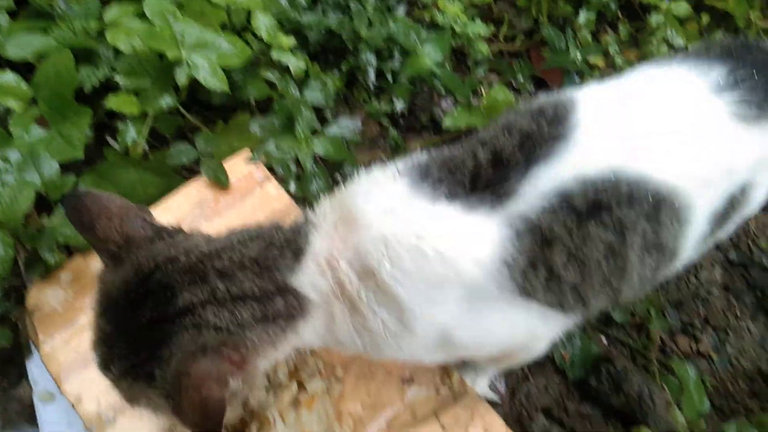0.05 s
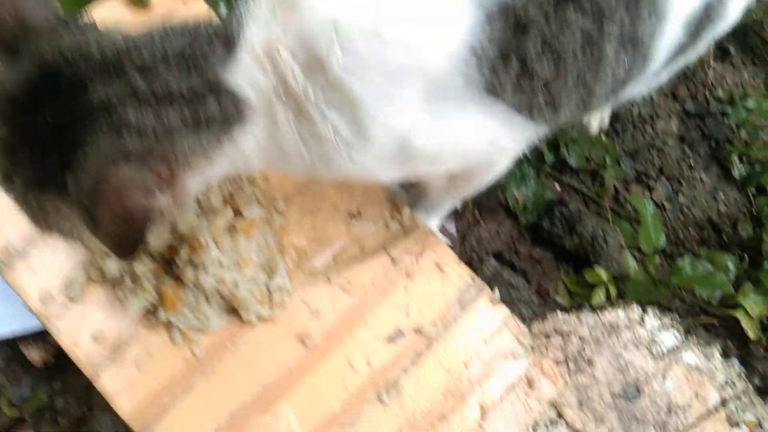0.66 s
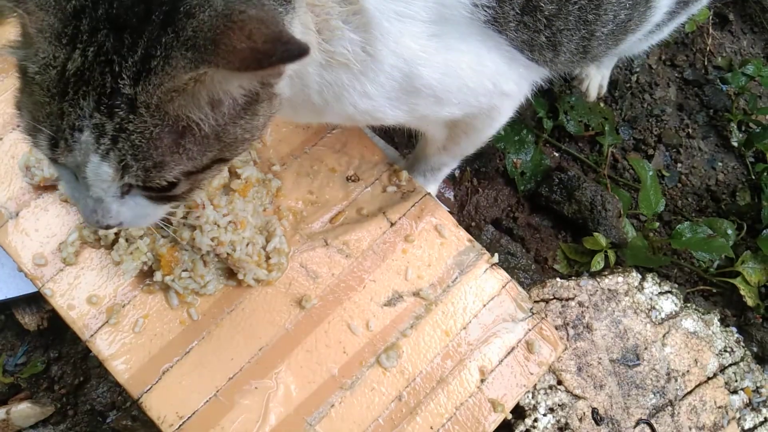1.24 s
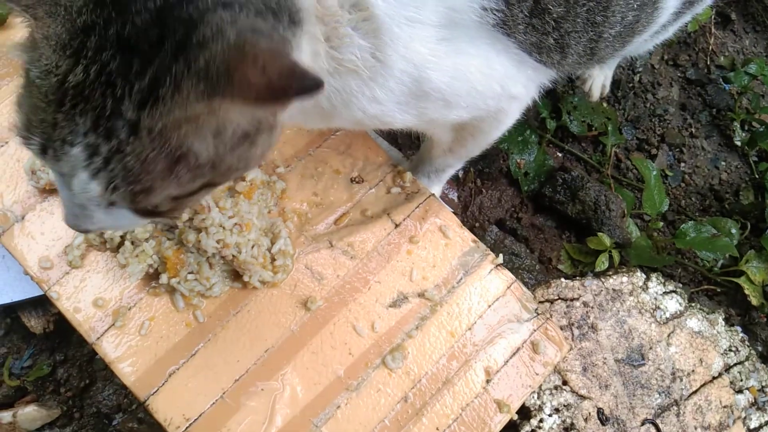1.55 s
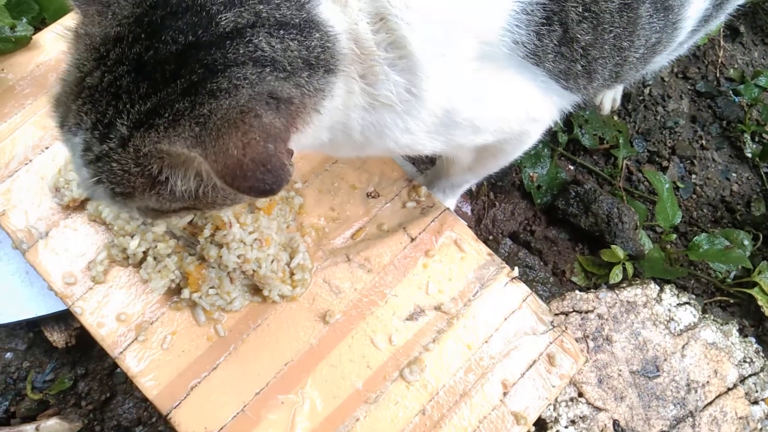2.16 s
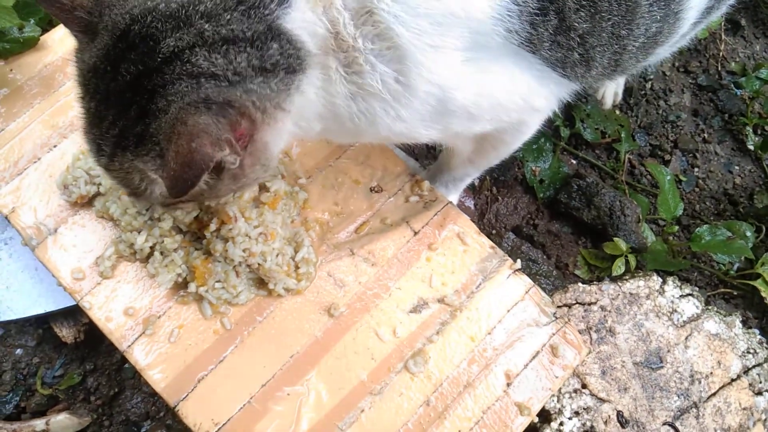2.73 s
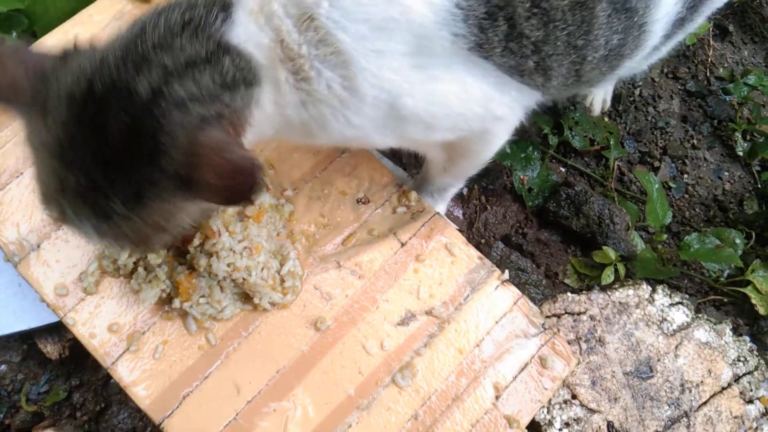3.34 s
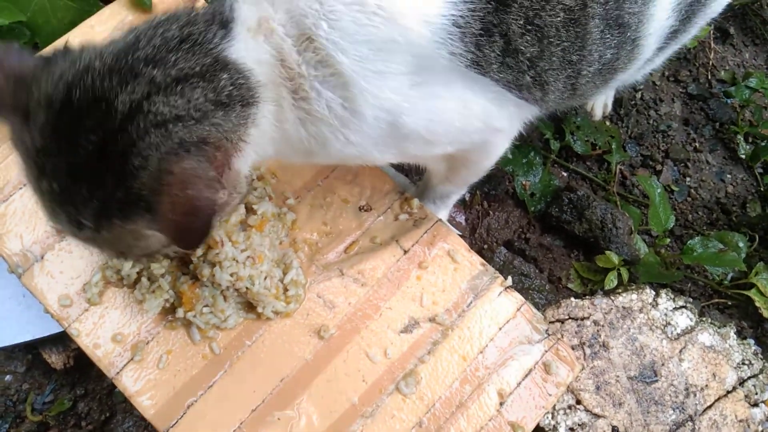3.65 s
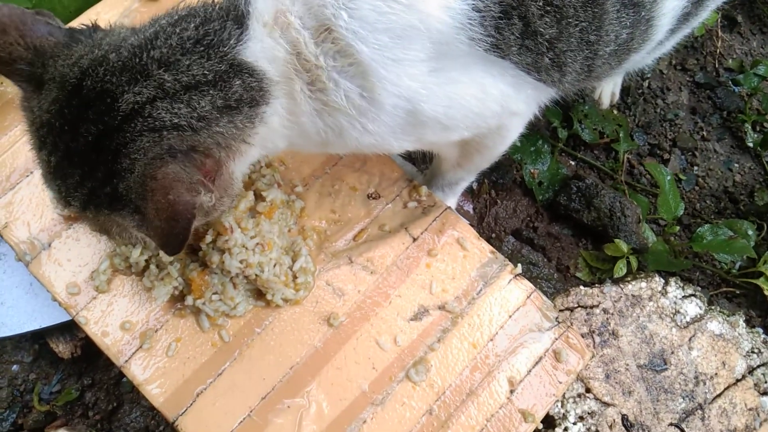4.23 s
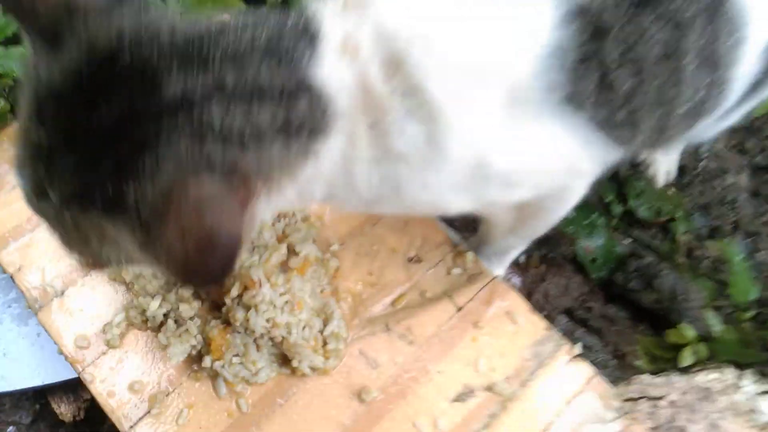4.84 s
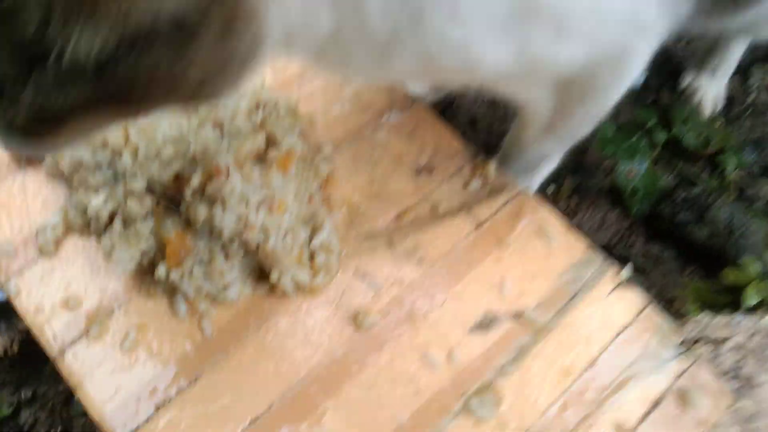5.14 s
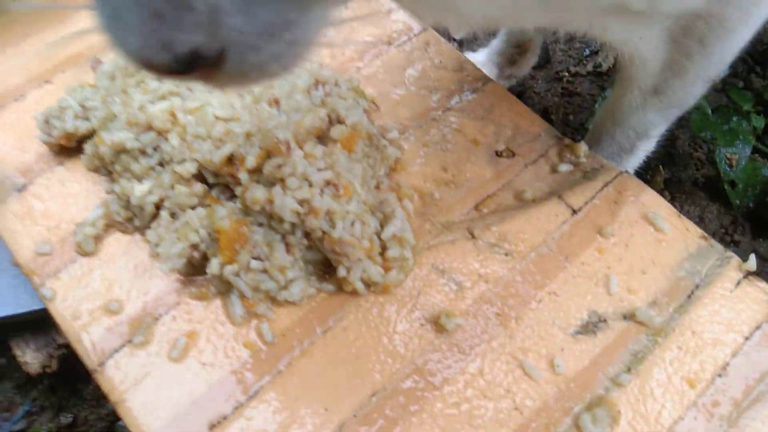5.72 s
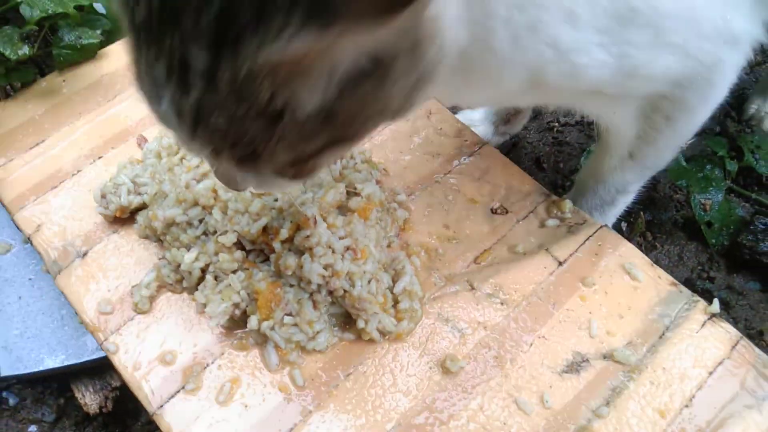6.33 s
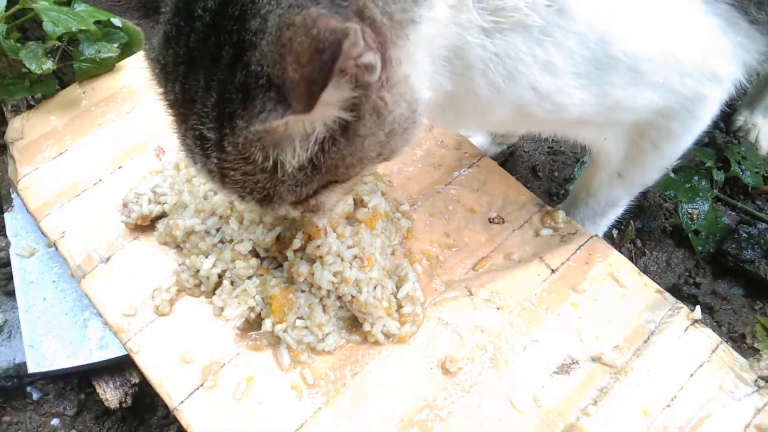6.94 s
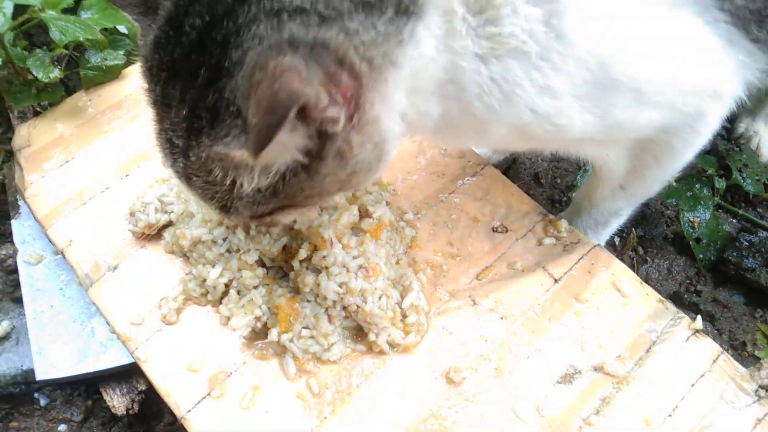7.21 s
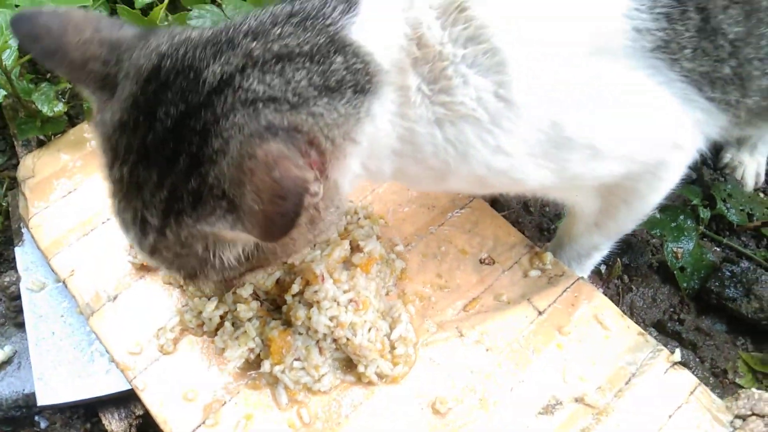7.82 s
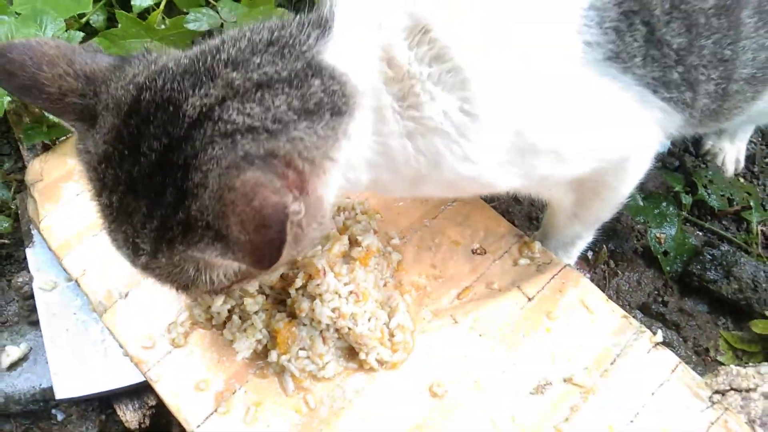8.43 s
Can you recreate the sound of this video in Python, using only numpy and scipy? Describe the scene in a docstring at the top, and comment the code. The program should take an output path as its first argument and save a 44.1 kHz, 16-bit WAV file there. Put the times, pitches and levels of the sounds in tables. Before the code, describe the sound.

A cat eats wet rice right by the microphone in a damp yard. Quick, sticky smacks and clicks of its mouth run on unevenly throughout, with soft squelching between them and an occasional small gulp. Small birds chirp a little way off in two spells, one early and one in the second half. Light rain hisses faintly underneath, and the yard adds a slight echo.

```python
"""A cat chewing wet rice

A cat eats from a wooden board in a damp yard, close to the microphone. Films of saliva tear in sticky
smacks that ring the mouth; the mash squelches and fizzes between them. Small birds chirp a little way
off, nearby walls answer, and light rain hisses; a noise suppressor thins the quiet parts."""
import sys
import numpy as np
from scipy import signal
from scipy.fft import rfft, irfft
from scipy.io import wavfile
from scipy.ndimage import uniform_filter1d

SR = 44100
rng = np.random.default_rng(int(sys.argv[2]) if len(sys.argv) > 2 else 0)


def unload_audio(sound):
    """Save the sound as a 16-bit wav file, at the path given as the first command line argument."""
    columns = np.transpose(np.atleast_2d(sound))
    # keep every value between -1 and 1, then stretch to whole-number steps
    steps = np.round(np.clip(columns, -1, 1) * 32767)
    wavfile.write(sys.argv[1], SR, steps.astype(np.int16))


N = 373562

# Clear smacks: (time [s], pop level [dB], mouth resonance [Hz], jaw thud [dB re pop],
# tooth snap [dB re pop], saliva fizz [dB re pop], squish [0 crisp to 1 smeared])
SMACKS = [(0.01, -44, 1650, -13, -8.5, -9.5, 0.98), (0.082, -47, 1670, -24, -28, -7, 0.14),
          (0.129, -57, 2080, 3, 6.5, 4.5, 0.98), (0.258, -49, 1820, -13, -32, -4.5, 0.84),
          (0.356, -51.5, 2440, -22, 1.5, -9, 0.73), (0.438, -58.5, 982, -17, 11.5, 1, 0.98),
          (0.623, -43, 1840, -18, -6, -40, 0.14), (0.642, -49, 1826, -45, -15, -9, 0.7),
          (0.683, -49.5, 2100, -6, -1.5, -27, 0.33), (0.737, -51.5, 1195, -9, -2.5, -26, 0.23),
          (0.835, -56, 2460, -33, 9.5, -6, 0.74), (0.876, -44.5, 2470, -14.5, -4.5, -26, 0.99),
          (0.891, -48, 1970, -14, 2, -4, 0.33), (0.977, -45.5, 2400, -17, -11, -5, 0.63),
          (1.028, -42.5, 1650, -13, -2, -6, 0.31), (1.139, -48.5, 1830, -6, -1, -5, 0.41),
          (1.417, -47, 1560, -9, -3, -6, 0.86), (1.663, -49, 1820, -14.5, 3.5, -6, 0.18),
          (1.671, -42.5, 1616, -10, 0.5, -9.5, 0.068), (1.834, -44.5, 2100, -9, -1, -2, 0.1),
          (1.903, -49.5, 2840, -13, 7.5, -5, 0.16), (1.942, -44, 2880, -18, -6, -9.5, 0.29),
          (1.981, -47, 1720, -14, -16, 1.5, .3), (2.02, -50, 2500, -39, -6, -12, 0.34),
          (2.078, -53, 1390, -1, -8, 3, 0.15), (2.138, -42, 2600, -6, -5, -7, 0.13),
          (2.173, -50, 1440, -3, -5, -25, 0.32), (2.326, -45, 2770, -19, -3.5, -19, 0.088),
          (2.357, -54, 2170, -18, 3, -15, .2), (2.398, -48.5, 1700, -6, -3, -21, 0.39),
          (2.423, -49.5, 2600, -17, -1, -18, 0.3), (2.646, -51, 2300, -22, -1, -2.5, 0.2),
          (2.531, -45.5, 2490, -32, -13, -23, 0.91), (2.666, -48, 1700, -9.5, -5, -2.5, 0.68),
          (2.747, -49, 1960, -9, -10, -8, 0.18), (2.895, -57, 810, 4.5, 7, -3, 0.47),
          (2.977, -43.5, 2060, -11.5, -4.5, -5.5, 0.12), (3.214, -45, 2380, -31, 0.5, -25, 0.29),
          (3.239, -43.5, 1700, -4, 3.5, -3.5, 0.046), (3.267, -50.5, 1280, -29, -7, -19, 0.12),
          (3.404, -45, 1700, -8, -9.5, -27, 0.069), (3.603, -43, 1590, -27, -11, -15, 0.3),
          (3.656, -44.5, 2230, -15, -9, -20, 0.39), (3.668, -41.5, 1270, -10, -13, -11.5, 0.11),
          (3.647, -44.5, 1415, -29, -18, -18, 0.16), (3.719, -42, 932, -9.5, -24, -23, 0.05),
          (3.797, -47.5, 1470, -8, -8, -24, 0.19), (4.035, -47.5, 2660, -10.5, -2.5, -6, 0.85),
          (4.107, -58, 2460, -23, 16.5, -20, 1), (4.183, -52, 2580, -37, -0.5, 2.5, 0.3),
          (4.206, -47.5, 1530, -9.5, -0.5, -19, 0.33), (4.308, -44.5, 2580, -9.5, 0, -7, 0.49),
          (4.414, -40.5, 2540, -11.5, -3.5, -14, 0.17), (4.544, -40.5, 2300, -14.5, -5, -3, 0.042),
          (4.605, -51, 2310, -17, -3.5, -2, .15), (4.72, -48.5, 1550, -31, -1, 1.5, 0.36),
          (4.789, -45, 2430, -9, -7, -1.5, 0.41), (4.871, -47.5, 950, -2, -4.5, -9, 0.95),
          (5.059, -50, 907, 0, 0, 0.5, 0.82), (5.112, -47.5, 1310, -6.5, -14, -8, 0.38),
          (5.484, -45.5, 2310, -10.5, -26, -10.5, 0.28), (5.571, -49.5, 1550, -16, -7, -3.5, 0.2),
          (5.786, -48.5, 2470, -30, -3, -6, 0.068), (5.874, -48, 2040, -27, -1, -5, 0.21),
          (5.909, -45.5, 2180, -17, 2, 0.5, 0.2), (5.936, -42, 2090, -15.5, -2.5, -5.5, 0.02),
          (5.995, -42.5, 1520, -13, -2, -14.5, 0.02), (6.054, -49.5, 2180, -28, 3, -5.5, 0.26),
          (6.119, -58.5, 2460, -29, 15.5, 10.5, 0.25), (6.177, -49, 1340, -3, -3, -0.5, 0.065),
          (6.236, -51.5, 2600, -4, 7, -0.5, 0.33), (6.266, -51, 2017, -5, 4.5, -2, .3),
          (6.291, -49, 2600, -4, -3, -9, 0.13), (6.326, -45.5, 1550, -11, -10, -10, 0.11),
          (6.512, -49.5, 1480, -24, -3.5, -3.5, 0.079), (6.567, -42.5, 1980, -5.5, -11, -5.5, 0.02),
          (6.641, -43, 2450, -17, 2, -9, 0.015), (6.755, -52, 1970, -22, -9, -3, 0.23),
          (6.886, -49, 1570, -2, -9.5, -6, 0.45), (6.902, -49, 1280, -8, -10, -10, 0.47),
          (6.989, -52.5, 1600, -37, 0.5, -3.5, 0.23), (7.023, -48, 1340, -13.5, -3.5, -2.5, 0.3),
          (7.073, -44.5, 1960, -33, -10, -5, 0.02), (7.079, -46, 1780, -19.5, -1.5, -2, 0.03),
          (7.135, -45.5, 2220, -30, -1.5, -1, 0.027), (7.178, -45.5, 1426, -38, -15, -5, 0.075),
          (7.212, -51.5, 1560, 0, 1.5, -2, 0.43), (7.452, -45.5, 1500, -9.5, -9, -4.5, 1),
          (7.491, -43, 1850, -13, -20, -10, 0.19), (7.531, -50, 1730, -2, 3, 0, 0.11),
          (7.509, -54.5, 2280, -4, -1, -3, .05), (7.643, -50.5, 1930, 0.5, -1, -9, 0.3),
          (7.758, -43, 1720, -9, -10, -9.5, 0.088), (7.784, -47.5, 1590, -12, -10, -5, 0.13),
          (7.851, -53, 2000, -43, 4, -3, 0.24), (7.909, -51, 2300, -3, -1, 0.5, 0.76),
          (7.981, -53, 2100, -25, 6, -2, 0.13), (7.998, -48, 2200, -26, -7, -4.5, 0.2),
          (8.109, -45.5, 1300, 0, 3, -1.5, 0.19), (8.171, -39, 1550, -31, -12.5, -12, 0.036),
          (8.246, -47, 1420, -19, -21, -13, 0.25), (8.269, -42.5, 1480, -4.5, -11, -8.5, 0.37),
          (8.32, -57, 1700, -3, 6, 6.5, .15), (8.377, -50, 1610, -30, 4, 2.5, 0.055),
          (8.395, -47, 1446, -38, -1, -2, 0.11)]
TYPICAL_POP_DB, USUAL_MOUTH_HZ = -45, 1860


def amp(db):
    """Amplitude ratio of a level in decibels."""
    return 10 ** (np.asarray(db) / 20)


def unit_energy(x):
    """Normalisation to an energy of one."""
    return x / np.sqrt(np.sum(x ** 2) + 1e-30)


def unit_rms(x):
    """Normalisation to a mean square of one."""
    return unit_energy(x) * np.sqrt(len(x))


def curve_at(points, hz):
    """Interpolation of (frequency, value) points on a logarithmic frequency axis."""
    point_hz, value = np.transpose(points)
    return np.interp(np.log(hz + 1), np.log(point_hz + 1), value)


def add(mix, time_s, sound):
    """Superposition: a sound sums into the mix from the given time."""
    start = round(time_s * SR)
    sound = sound[max(-start, 0):]
    part = mix[max(start, 0):][:len(sound)]
    part += sound[:len(part)]


def coloured(x, points):
    """Zero-phase filtering by a curve of (frequency [Hz], gain [dB])."""
    gain = amp(curve_at(points, np.fft.rfftfreq(len(x), 1 / SR)))
    return irfft(rfft(x) * gain, len(x))


def band(hz, low_hz, high_hz, order):
    """Band-pass magnitude response, with skirts of 6 dB per octave for each order."""
    return 1 / np.sqrt((1 + (low_hz / (hz + 1)) ** (2 * order)) * (1 + (hz / high_hz) ** (2 * order)))


def causal(gain):
    """Minimum phase: like a passive resonator, the response rings only after the blow."""
    log_gain = np.log(np.maximum(gain / gain.max(), 1e-5))
    phase = -signal.hilbert(np.r_[log_gain, log_gain[-2:0:-1]]).imag
    return gain * np.exp(1j * phase[:len(gain)])


def grains(samples, per_s, spread_db):
    """Shot noise: random impulses of either sign, a few much larger than the rest."""
    chance, size, sign = rng.random((3, samples))
    size = np.minimum(-np.log(1 - size), 4)
    return (chance < per_s / SR) * amp(spread_db * size) * np.sign(sign - .5)


def swell(t, build_s, fade_s):
    """Exponential growth up to t = 0 and exponential decay after it."""
    return np.exp(np.where(t < 0, t / build_s, -t / fade_s))


def rain(db=-54.5, patchy_db=3.0):
    """Incoherent summation: fine drops on leaves merge into noise, patchy in time and frequency."""
    # Spectrum of the wash: (frequency [Hz], relative spectral density [dB])
    wash = [(24, -32), (38, -29), (55, 10), (110, 5.5), (300, -3), (650, -7), (1600, -10.5), (3000, -4),
            (5500, -15.5), (8000, -12.5), (9500, -4.5), (11000, -11.5), (13000, -3), (16000, -14)]
    frames, hz = N // 256 + 5, np.fft.rfftfreq(1024, 1 / SR)
    real, imag, patches = rng.standard_normal((3, frames, len(hz)))
    patches = uniform_filter1d(patches, size=10, axis=0)
    patches = uniform_filter1d(patches, size=8, axis=1)
    spectra = (real + 1j * imag) * amp(curve_at(wash, hz) + patchy_db * patches / patches.std())
    return amp(db) * unit_rms(signal.istft(spectra.T, nperseg=1024, noverlap=768)[1][:N])


def jaw_pressure(build_s, fade_s, follows=0.36):
    """Amplitude envelope of chewing: squeezes build to each smack, relax, and add in power."""
    power = np.zeros(N)
    t = np.arange(-SR // 4, SR // 2) / SR
    squeeze = swell(t, build_s, fade_s)
    for time_s, pop_db, *_ in SMACKS:
        add(power, time_s + t[0], (amp(follows * pop_db) * squeeze) ** 2)
    return np.sqrt(power)


def crushed_rice(db=-70):
    """Modulated shot noise: wet grains burst as the jaw closes and settle after each smack."""
    # Spectrum of the moist crackle: (frequency [Hz], relative spectral density [dB])
    crackle = [(250, -47), (450, -13), (1000, -6), (2200, 6), (4200, -2), (6000, -32), (8000, -4),
               (10500, -17), (15000, -39)]
    bursts = grains(N, per_s=540, spread_db=6) * jaw_pressure(build_s=0.023, fade_s=0.013)
    return amp(db) * unit_rms(coloured(bursts, crackle))


def froth(db, per_s, low_hz, high_hz, ring_cycles, fade_s, spread_db=7.0, pitches=150):
    """Bubble resonance: countless tiny bubbles ping while the jaw works, each at its own pitch."""
    cycles = np.geomspace(low_hz, high_hz, pitches)[:, None] * np.arange(SR // 20) / SR
    rings = (1 - np.exp(-cycles)) * amp(-60 * cycles / ring_cycles) * np.sin(2 * np.pi * cycles)
    when, pitch, size = rng.random((round(per_s * N / SR), 3)).T
    gains = amp(spread_db * np.minimum(-np.log(1 - size), 3))
    out = np.zeros(N)
    for time_s, row, gain in zip(when * N / SR, (pitch * pitches).astype(int), gains):
        add(out, time_s, gain * rings[row])
    return amp(db) * unit_rms(out * jaw_pressure(build_s=0.09, fade_s=fade_s))


def rupture(t, squish):
    """Impulsive excitation: a saliva film peels, snaps at t = 0 and collapses in smaller breaks."""
    snap = np.zeros(len(t))
    snap[np.argmin(abs(t))] = 1
    spray = grains(len(t), per_s=7000, spread_db=5.2) * swell(t, build_s=0.0041, fade_s=0.0064)
    spray_share = np.clip(squish, 0, 1) ** 1.19
    return np.sqrt(1 - spray_share) * snap + np.sqrt(spray_share) * unit_energy(spray)


def air_pockets(hz, depth_db=7.5, count=84):
    """Cavity resonances: air between tongue, palate and food gives random peaks and dips in gain."""
    centres_hz = np.linspace(np.sqrt(hz[1]), np.sqrt(hz[-1]), count) ** 2
    heights_db = depth_db * np.clip(rng.standard_normal(count), -2, 2)
    return amp(np.interp(hz, centres_hz, heights_db))


def smack(pop_db, mouth_hz, thud_db, snap_db, fizz_db, squish, size=6144):
    """Source and filter: a rupture rings jaw, mouth, teeth and lips. Returns (start offset [s], sound)."""
    t, hz = (np.arange(size) - size // 4) / SR, np.fft.rfftfreq(size, 1 / SR)
    crackle = grains(size, per_s=500, spread_db=5.9) * swell(t, build_s=0.0053, fade_s=0.031)
    excess_db = pop_db - TYPICAL_POP_DB
    stretch = 2 ** max(excess_db, 0)  # each decibel above typical doubles the length of the tear
    drive = rfft(rupture(t / stretch, squish) + amp(-10.5) * unit_energy(crackle))
    width_hz = 72 * 2 ** (excess_db / 31)  # a hard smack opens the mouth, widening its resonance
    mouth = amp(-12.5) + 1 / np.hypot(1, (hz - mouth_hz) / width_hz)
    thud = band(hz, 432, 579, order=5)
    pop = band(hz, 938, 3000, order=6) * mouth
    snap = band(hz, 2170, 4590, order=8)
    sparkle = amp(-9 - 14 * squish) * band(hz, 9000, 15000, order=4)  # crisp breaks reach highest
    fizz = band(hz, 7960, 9220, order=8) + sparkle
    pockets = air_pockets(hz)
    power = 0
    for db, part in (thud_db, thud), (0, pop), (snap_db, snap), (fizz_db, fizz):
        response = pockets * part
        power += (amp(db) * response) ** 2 / np.mean(abs(drive * response) ** 2)
    gain = amp(pop_db) * np.sqrt(0.01 * SR)  # the level refers to the energy spread over 10 ms
    return t[0], gain * irfft(drive * causal(np.sqrt(power)))


def bubbles(db, mouth_hz, count=2, spread_db=5, octaves=0.702, ring_cycles=105, wait_s=.02):
    """Damped oscillation: bursting saliva bubbles ping above the mouth's pitch, rising slightly."""
    out, t = np.zeros(SR // 4), np.arange(SR // 12) / SR
    for pitch, size, wait in rng.standard_normal((count, 3)):
        hz = mouth_hz * 2 ** (octaves * abs(pitch))
        age = hz * t / ring_cycles
        envelope = (1 - np.exp(-hz * t)) * amp(-60 * age)
        ring = envelope * np.sin(2 * np.pi * hz * t * (1 + .02 * age))
        add(out, wait_s * abs(wait), amp(db + spread_db * np.clip(size, -1, 1)) * ring)
    return out


def small_smack(db, mouth_hz, spread_db=3):
    """Weak excitation of the mouth: a sticky tick of random strength, resonance and wetness."""
    mouth, pop, snap, fizz = rng.uniform(-0.59, 1, size=4)
    _, sound = smack(db + spread_db * pop, mouth_hz * 1.43 ** mouth, thud_db=-9,
                     snap_db=0.5 + spread_db * snap, fizz_db=-1 + spread_db * fizz, squish=0.24)
    return sound


def smacking(bubble_db=-51, trail_db=-59, stray_db=-60, follows=0.56):
    """A train of transients: each smack, its bubbles, a small smack as the tongue leaves; stray ticks."""
    out = np.zeros(N)
    for time_s, pop_db, mouth_hz, *timbre in SMACKS:
        offset_s, sound = smack(pop_db, mouth_hz, *timbre)
        add(out, time_s + offset_s - .0004, sound)
        effort_db = follows * (pop_db - TYPICAL_POP_DB)
        add(out, time_s, bubbles(bubble_db + effort_db, mouth_hz))
        relaxed_hz = np.sqrt(mouth_hz * USUAL_MOUTH_HZ)  # halfway back to the mouth's usual shape
        wait_s = .015 + rng.exponential(.035)
        add(out, time_s + offset_s + wait_s, small_smack(trail_db + effort_db, relaxed_hz))
    for time_s in rng.uniform(0, N / SR, size=70):
        add(out, time_s, small_smack(stray_db, USUAL_MOUTH_HZ))
    return out


def plops(t60_s=0.14, glide=0.024):
    """Free decay of a cavity: a shifting mouthful rings throat or mouth, its pitch creeping up."""
    # Plops, low in the throat or higher in the mouth: (time [s], level [dB], pitch [Hz])
    rings = [(0.255, -46, 639), (0.443, -46, 376), (1.045, -44.5, 1998), (1.3, -46.5, 1586),
             (1.98, -46.5, 1675), (4.544, -44, 2186), (4.869, -47, 996), (6.899, -46, 465)]
    out, t = np.zeros(N), np.arange(SR // 5) / SR
    for time_s, db, pitch_hz in rings:
        envelope = (1 - np.exp(-t / 0.00017)) * amp(db - 60 * t / t60_s)
        hz = pitch_hz * (1 + glide * t / t60_s)
        add(out, time_s, envelope * np.sin(2 * np.pi * np.cumsum(hz) / SR))
    return out


def slurp(db, hz, length_s, width, glide):
    """Swept resonance: tiny wet breaks ring a changing gap; width and glide are shares of its pitch."""
    progress = np.arange(round(2 * length_s * SR)) / (length_s * SR)
    carrier = np.exp(2j * np.pi * np.cumsum(hz * (1 + glide * (progress - .5))) / SR)
    breaks = grains(len(progress), per_s=6000, spread_db=4.5) * progress * np.exp(-3.5 * progress)
    baseband = breaks / carrier  # a low-pass here acts as a band-pass that follows the carrier
    pole = np.exp(-np.pi * width * hz / SR)
    for _ in range(3):
        baseband = signal.lfilter([1 - pole], [1, -pole], baseband)
    return amp(db) * np.sqrt(length_s * SR) * unit_energy((baseband * carrier).real)


def gulps():
    """A falling throat resonance sounds as tongue and cheeks push the mash back."""
    # Soft gulps: (time [s], level [dB], pitch [Hz], length [s])
    swallows = [(0.433, -53, 394, .035), (1.007, -57, 475, 0.019), (1.298, -53.5, 482, .03),
                (1.33, -59, 360, 0.058), (2.95, -54.5, 440, 0.053), (3.479, -52.5, 445, 0.029),
                (3.729, -52, 485, 0.024), (4.784, -54.5, 384, .025), (5.094, -53, 440, 0.036),
                (6.885, -49, 373, .04), (7.199, -39.5, 550, .012)]
    out = np.zeros(N)
    for time_s, *gulp in swallows:
        add(out, time_s, slurp(*gulp, width=.5, glide=-0.12))
    return out


def birds(rise=0.1117, fall_hz_per_s=6800, warble_hz=169.4):
    """Frequency modulation: each whistle flicks up and slides down; a fast, uneven warble makes it rasp."""
    # Chirps: (time [s], length [s], top pitch [Hz], level [dB], rasp [share of pitch])
    chirps = [(1.217, 0.059, 3230, -42.5, 0.042), (1.525, 0.089, 3146, -45, 0.075),
              (1.602, 0.062, 4310, -50, 0.051), (1.711, 0.057, 3146, -41.5, 0.05),
              (1.9, .09, 3450, -42, .06), (2.125, 0.062, 3540, -41.5, .06),
              (2.34, 0.074, 3300, -41.5, 0.05), (5.289, 0.026, 4590, -47, 0.031),
              (5.299, 0.038, 4110, -44.5, 0.02), (5.368, .06, 3486, -38.5, .02),
              (5.837, 0.041, 3460, -43, .02), (5.997, .06, 3340, -40, .04),
              (6.4, 0.0653, 3378, -40.5, 0.038), (6.638, 0.035, 2970, -44.5, 0.035),
              (6.677, 0.067, 3430, -41.5, 0.049), (7.342, 0.047, 5810, -52, 0.041),
              (7.353, 0.022, 3830, -47.5, 0.023), (7.401, 0.047, 4123, -35.5, 0.024)]
    out = np.zeros(N)
    for time_s, length_s, top_hz, db, rasp in chirps:
        progress = np.linspace(0, 1, round(length_s * SR))
        tremor = unit_rms(uniform_filter1d(rng.standard_normal(SR // 4), size=60))[:len(progress)]
        warble = unit_rms(tremor + 2 * np.sin(2 * np.pi * warble_hz * length_s * progress))
        contour_hz = [top_hz * (1 - rise), top_hz, top_hz - fall_hz_per_s * length_s]
        hz = np.interp(progress, [0, .25, 1], contour_hz) * (1 + rasp * warble / 2)
        envelope = np.interp(progress, [0, .3, .7, 1], [0.48, 0.64, 0.58, 0.46])
        whistle = envelope * np.sin(2 * np.pi * np.cumsum(hz) / SR)
        add(out, time_s, amp(db) * unit_rms(whistle))
    return out


def saliva_threads(width_octaves=0.35, fade_s=0.0033, size=2048):
    """Impulse response: a thread of saliva breaks in tiny clicks that ring around one high pitch."""
    # Snapping threads: (time [s], peak level [dB], pitch [Hz])
    snaps = [(1.352, -30, 12600), (1.995, -28, 12300), (4.544, -36, 12700), (5.026, -29.5, 10100),
             (5.092, -27.5, 9540), (6.119, -28, 12700)]
    out, t, hz = np.zeros(N), np.arange(size) / SR, np.fft.rfftfreq(size, 1 / SR)
    for time_s, db, pitch_hz in snaps:
        resonance = causal(1 / (1 + (np.log2((hz + 1) / pitch_hz) / width_octaves) ** 2))
        clicks = grains(size, per_s=5000, spread_db=8.2) * np.exp(-t / fade_s)
        sound = irfft(rfft(clicks) * resonance)
        add(out, time_s, amp(db) * sound / (abs(sound).max() + 1e-12))
    return out


def spritzes():
    """A high, slightly rising resonance sounds as saliva is sucked through a narrow gap of the lips."""
    # Spritzes of saliva: (time [s], level [dB], pitch [Hz], length [s])
    sucks = [(1.433, -51, 8400, .01), (1.631, -55.5, 7830, 0.034), (4.54, -50.5, 6060, 0.0052),
             (4.783, -53, 7350, .018), (6.566, -47.5, 6640, .005), (7.023, -52, 7500, 0.012),
             (7.078, -49, 7200, .005), (7.622, -44.5, 8200, .01), (7.639, -52, 6000, .014),
             (7.903, -53, 7540, 0.031), (8.105, -52.5, 5900, 0.011)]
    out = np.zeros(N)
    for time_s, *spritz in sucks:
        add(out, time_s, slurp(*spritz, width=0.35, glide=0.045))
    return out


def bites(rebound_s=0.00148, shrink=0.66, width_hz=250, length_s=0.0061, size=2048):
    """Damped impact: the jaws clamp and rebound twice, each time sooner; the cheeks muffle the knock."""
    # Firm bites: (time [s], level [dB], pitch [Hz], rebound [share of the previous blow])
    clamps = [(2.1373, -45, 1150, 0.15), (3.2129, -39.5, 1300, 0.091), (7.2022, -33.5, 1480, 0.56)]
    out, hz = np.zeros(N), np.fft.rfftfreq(size, 1 / SR)
    contacts_s = np.cumsum([0, rebound_s, rebound_s * shrink])
    for time_s, db, pitch_hz, rebound in clamps:
        blows = sum(rebound ** k * np.exp(-2j * np.pi * hz * s) for k, s in enumerate(contacts_s))
        body = band(hz, 330, 2270, order=8) / np.hypot(1, (hz - pitch_hz) / width_hz)
        knock = unit_energy(irfft(blows * causal(body)))
        add(out, time_s, amp(db) * np.sqrt(length_s * SR) * knock)
    return out


def cat():
    """Superposition at the mouth: squelching mash, sizzling lip foam, ticking rice and the transients."""
    crackle = crushed_rice()
    squelch = froth(db=-66, per_s=222.5, low_hz=1203, high_hz=5795, ring_cycles=40, fade_s=0.44)
    sizzle = froth(db=-67.5, per_s=299.5, low_hz=6907, high_hz=9602, ring_cycles=130, fade_s=0.2)
    ticks = froth(db=-63.5, per_s=69, low_hz=1695, high_hz=4406, ring_cycles=82, fade_s=0.4)
    transients = smacking() + plops() + gulps() + spritzes() + saliva_threads() + bites()
    return crackle + squelch + sizzle + ticks + transients


def yard(x, gap_s=0.0013, echoes_per_s=4000):
    """Reverberation: dense weak echoes from ground, board and walls, each band dying at its own rate."""
    # Decay of the echoes: (frequency [Hz], time to fall 60 dB [s])
    decay_times = [(300, 0.44), (3300, 0.61), (8000, 0.43), (15000, 0.41)]
    # Colour of the echoes: (frequency [Hz], gain [dB])
    echo_colour = [(450, -3), (3500, -1.5), (5800, -1), (7700, 4.5), (11000, 3)]
    echoes = rng.standard_normal(SR) * (rng.random(SR) < echoes_per_s / SR)
    hz, t, spectra = signal.stft(echoes, SR, nperseg=256)
    decay = amp(-60 * t / curve_at(decay_times, hz)[:, None])
    tail = signal.istft(spectra * decay, SR, nperseg=256)[1][:SR]
    t = np.arange(len(tail)) / SR
    onset = np.clip(t / gap_s - 1, 0, 1)
    early_lift = 1 + 0.95 * np.exp(-t / 0.081)
    response = coloured(unit_energy(tail * onset * early_lift), echo_colour)
    return signal.fftconvolve(x, response)[:N]


def suppress_noise(x, start_db=1.0, knee_db=8.0, depth_db=8.0, bass_hz=200):
    """Spectral gating: every bin that does not stand clear of its own background is turned down."""
    hz, _, spectra = signal.stft(x, SR, nperseg=640, noverlap=480)
    power = uniform_filter1d(abs(spectra) ** 2, size=5, axis=1)
    level_db = 10 * np.log10(abs(power) + 1e-20)
    floor_db = uniform_filter1d(np.percentile(level_db, 30, axis=1), size=9)[:, None]
    shut = np.clip(1.5 - (level_db - floor_db - start_db) / knee_db, 0, 1)
    shut[hz < bass_hz] = 1  # the bass is always held down
    return signal.istft(spectra * amp(-depth_db * shut), nperseg=640, noverlap=480)[1][:N]


def scene():
    """Direct and reverberant sound: the near cat is fairly dry; the birds arrive mostly as echo."""
    eating, song = cat(), birds()
    sent = amp(-3.5) * eating + amp(-1.5) * song
    turn = np.pi * np.arange(N) / SR  # head and microphone keep moving, so the echo paths change
    echo = yard(sent * np.sin(turn)) + yard(sent * np.cos(turn))
    return (eating + song / 4 + echo + rain())[None]


def record(dry):
    """Transduction: microphone colour, noise suppression and a band limit, in series."""
    # Response of the small microphone: (frequency [Hz], gain [dB])
    microphone = [(300, -4.5), (450, -3), (560, -6.5), (630, -5), (750, 2.5), (4700, -0.5), (6200, 4.5),
                  (7600, 5), (11000, -11)]
    gated = suppress_noise(coloured(dry[0], microphone))
    low_pass = signal.firwin(511, cutoff=15950, window=("kaiser", 9), fs=SR)
    return signal.oaconvolve(gated, low_pass, "same")[None]


dry = scene()
out = record(dry)
unload_audio(out)
```